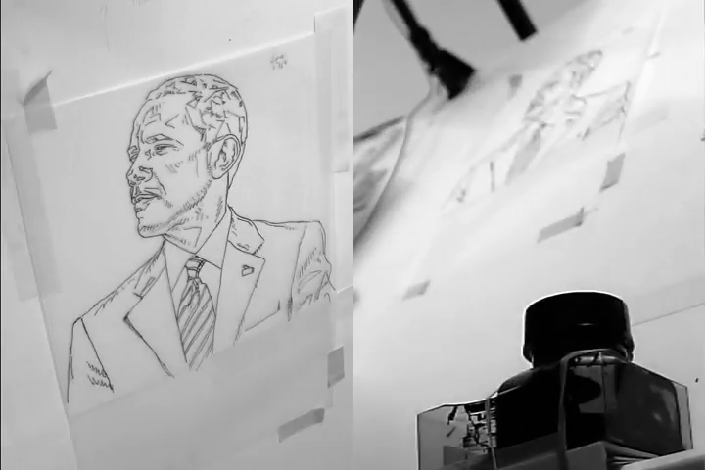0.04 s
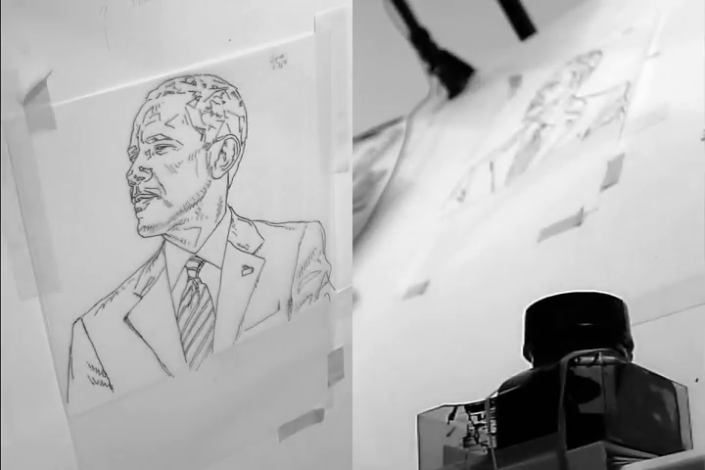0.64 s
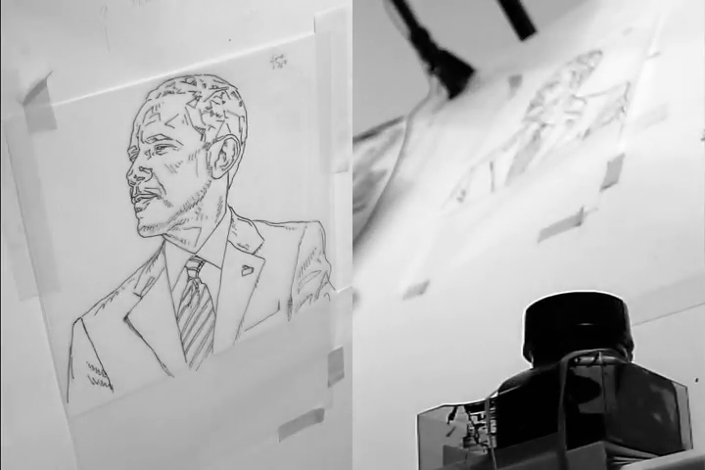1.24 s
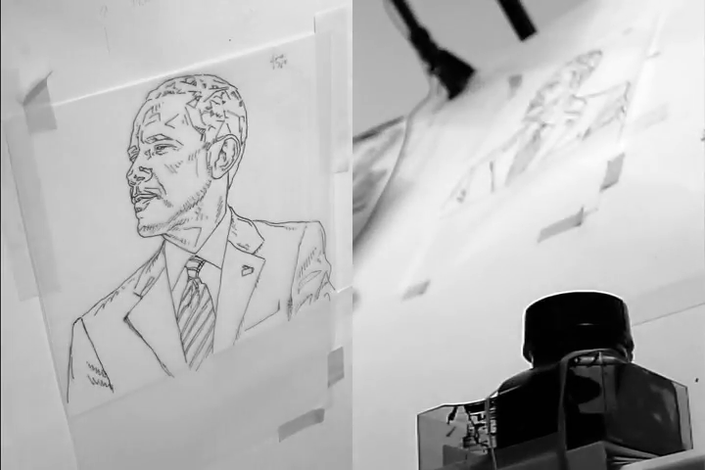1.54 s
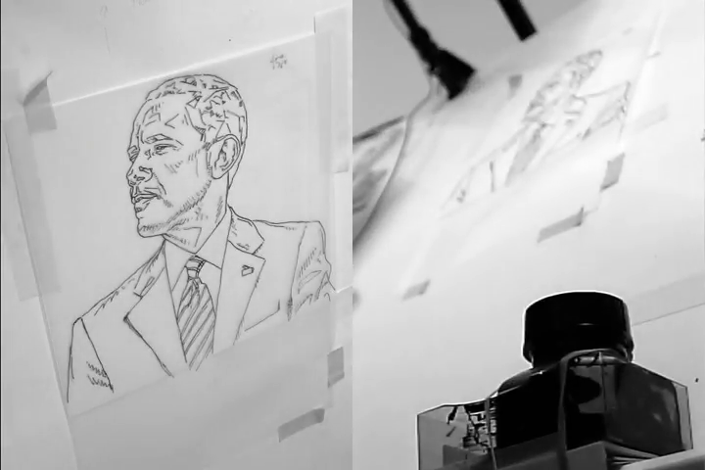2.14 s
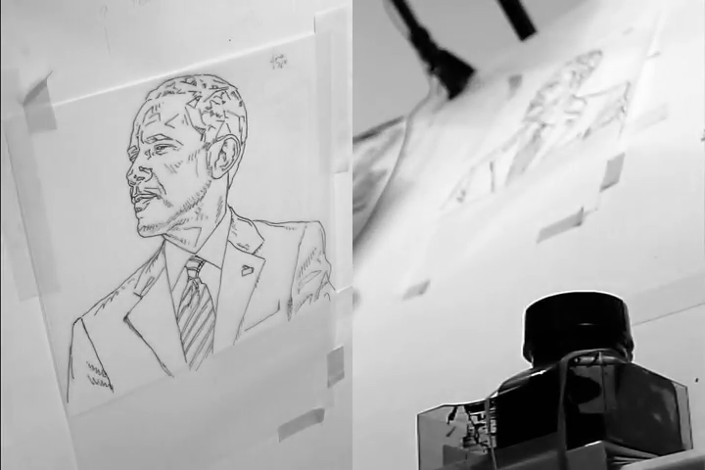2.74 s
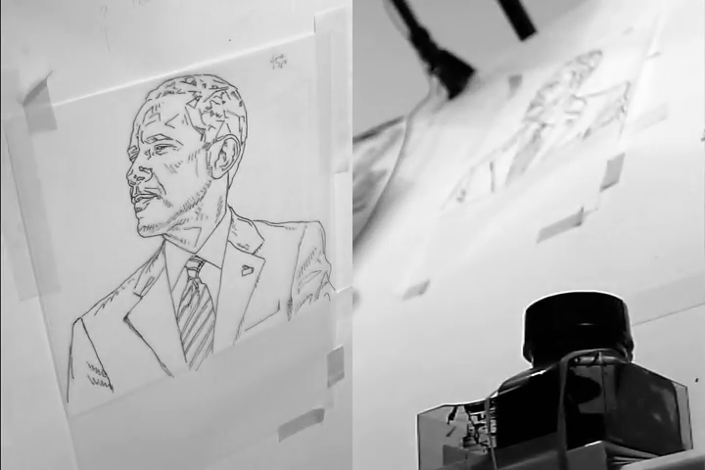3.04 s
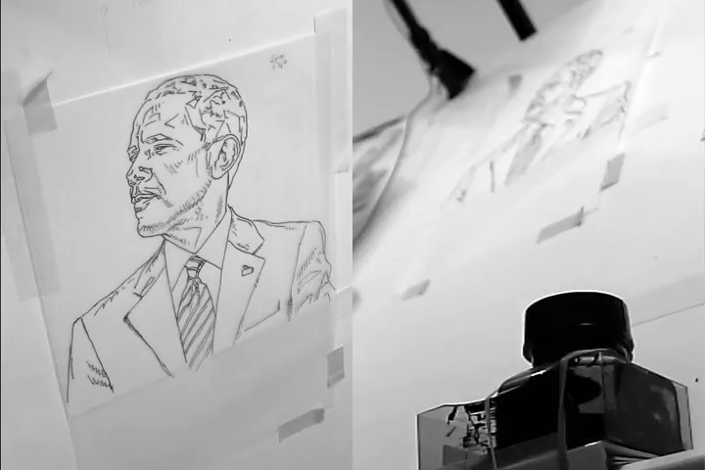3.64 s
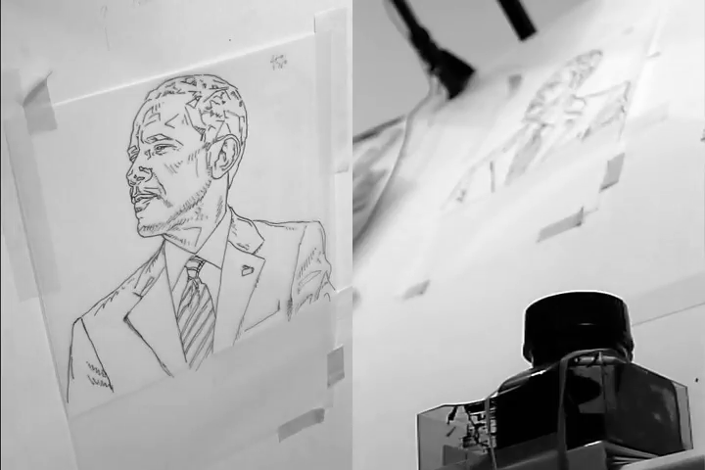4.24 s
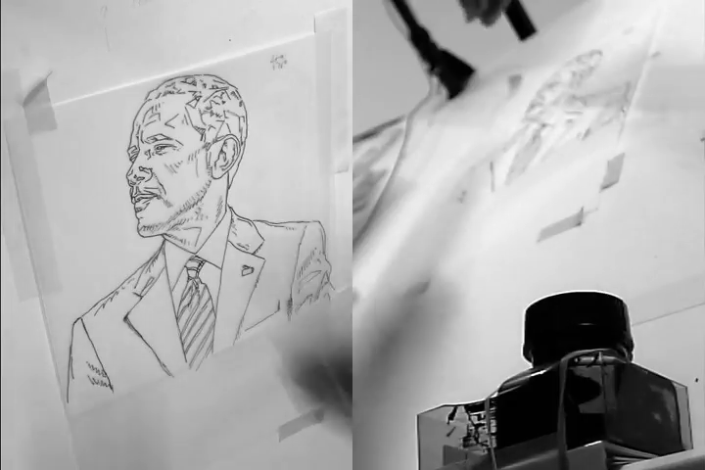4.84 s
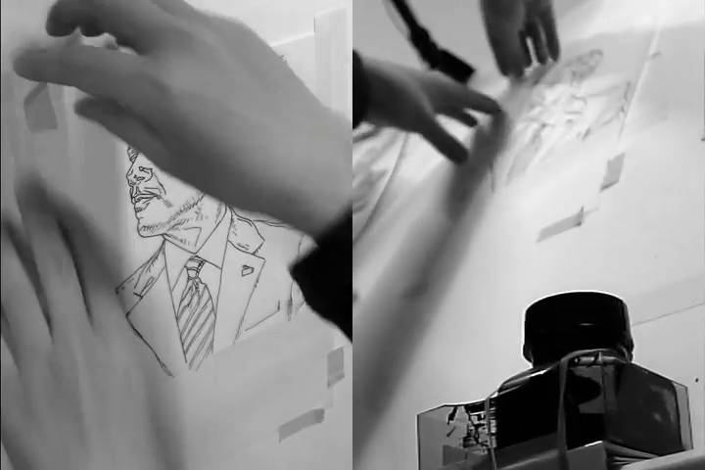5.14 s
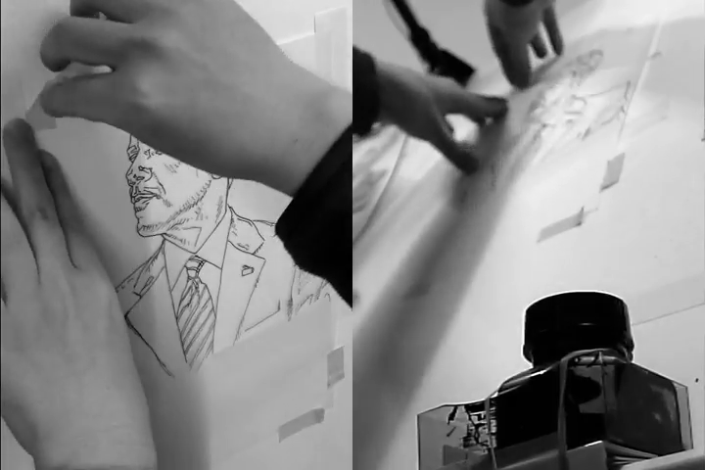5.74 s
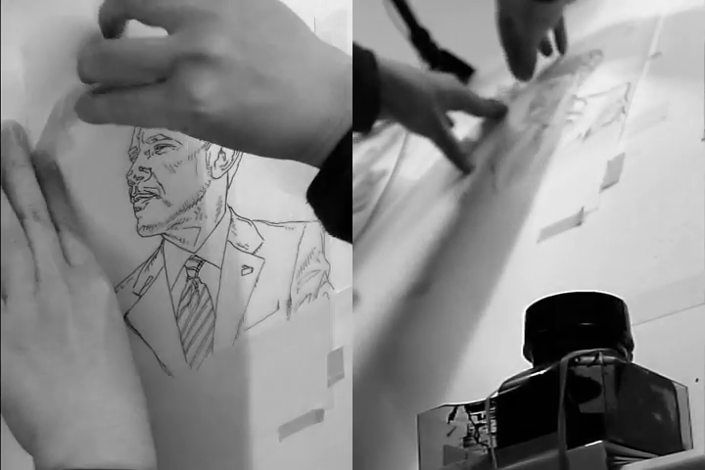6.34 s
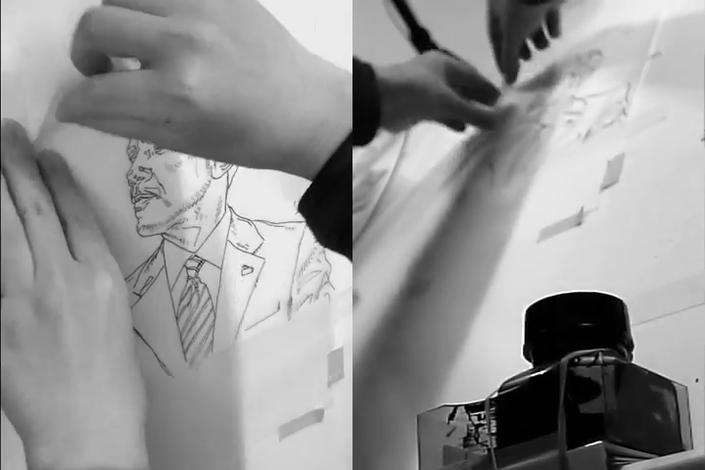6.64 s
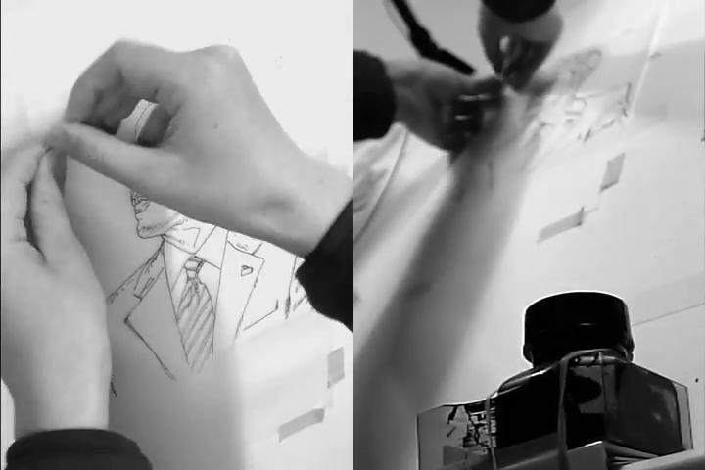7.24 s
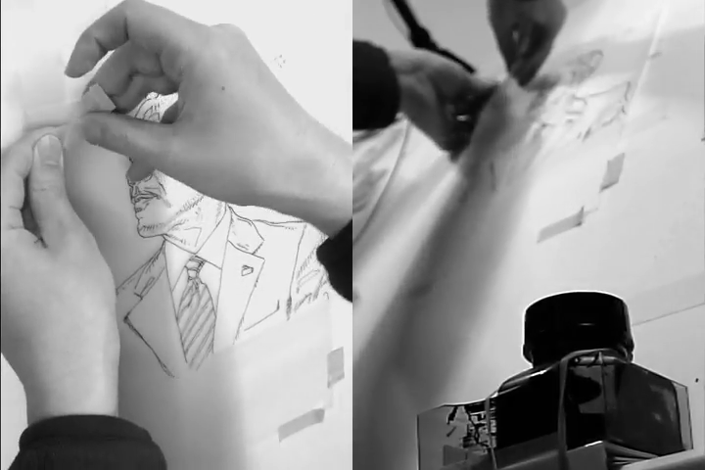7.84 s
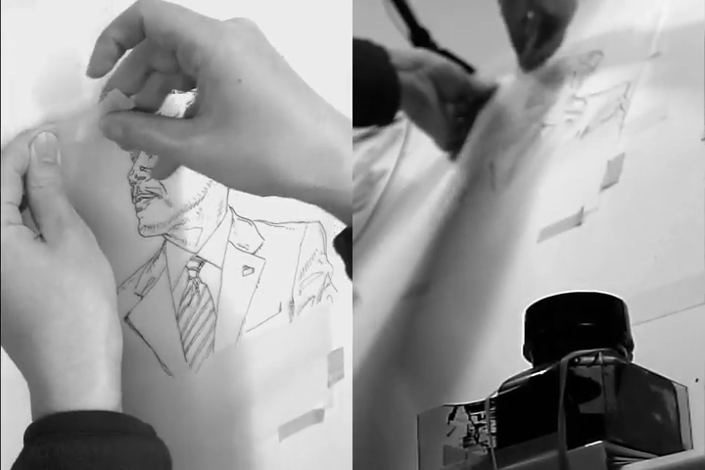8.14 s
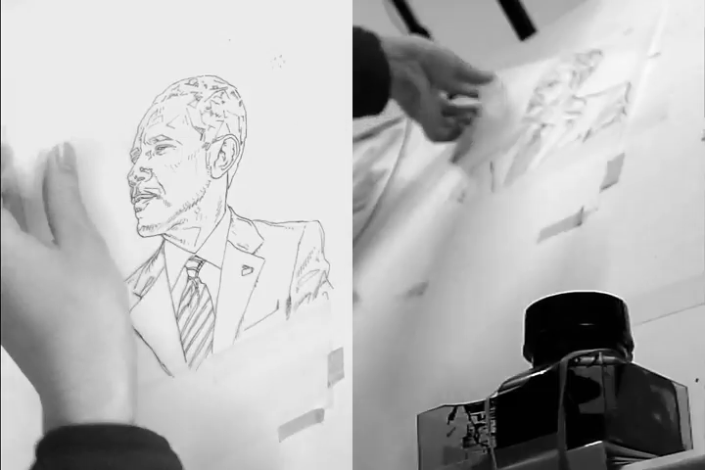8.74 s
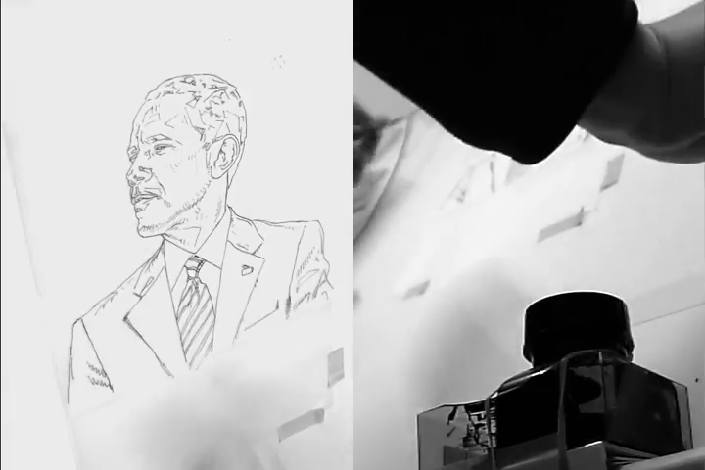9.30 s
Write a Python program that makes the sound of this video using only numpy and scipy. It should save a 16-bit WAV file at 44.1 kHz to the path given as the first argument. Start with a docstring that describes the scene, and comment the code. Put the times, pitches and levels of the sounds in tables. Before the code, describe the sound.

Something is picked up and shuffled across the room, giving light knocks and a brief scrape with a little echo. Then, up close and dry, cloth sweeps softly over a desk, hands thump down, and paper snaps crisply as it is pulled free. Fingers rub and slide over the sheet with small crackles, above a steady, faint indoor hiss and hum.

```python
"""Hollow knocks and a rough drag, a little way off: something is picked up and shuffled in a quiet room.
A sleeve brushes a drawing desk and hands land on it, ringing its low modes. Close up, a sheet of paper
buckles with sharp cracks, is jerked loose and is smoothed down, its fibres catching under the fingers.
The paper is almost dry and the far handling is roomy; under both lies a bed of hiss and faint hum."""
import sys
import numpy as np
from scipy import signal
from scipy.fft import rfft, irfft
from scipy.io import wavfile
from scipy.ndimage import uniform_filter1d

SR = 44100
rng = np.random.default_rng(int(sys.argv[2]) if len(sys.argv) > 2 else 0)


def materialize(psi):
    """Save the field psi as 16-bit PCM at rate SR to the path in sys.argv[1].

    A 1-D psi becomes a single channel; in a 2-D psi each row is a channel.
    """
    bounded = np.clip(np.atleast_2d(psi).T, -1, 1)
    quanta = np.round(bounded * 32767).astype(np.int16)
    wavfile.write(sys.argv[1], SR, quanta)


N = 413216
TIME = np.arange(N) / SR

# Cue lists; their levels are trims ahead of each layer's EQ and gain.
# the sheet buckles: (time [s], crack [dB], flap [dB], crinkle decay [s], crack [Hz], flap [Hz])
SNAP_CUES = [(2.9706, -35, -65, 0.0031, 5100, 891), (3.1083, -36, -59, 0.0036, 5930, 993),
             (5.2198, -30, -50.5, 0.0027, 5550, 1370), (5.7286, -37, -63, 0.0015, 5900, 775),
             (5.7459, -41, -55, 0.0014, 4460, 1880), (5.971, -17.5, -38, 0.0022, 5370, 1730),
             (6.2342, -14, -33, 0.002, 6200, 1530), (6.3051, -18, -50, 0.0043, 5700, 1120),
             (6.3118, -15, -53, 0.0017, 5470, 1710), (6.317, -23, -29.5, 0.0014, 6500, 1950),
             (6.3204, -6.5, -40, 0.0023, 6560, 1130), (6.3236, -22, -38.5, 0.0025, 6350, 610),
             (6.4191, -31, -41, 0.0011, 5550, 1180), (7.017, -39, -49.5, 0.002, 4540, 1750),
             (7.1593, -28, -40, 0.0029, 5040, 1680), (7.1678, -22.5, -41, 0.0015, 4540, 1930),
             (7.3258, -19.5, -35, 0.0011, 4900, 1560), (8.121, -32, -49, 0.0013, 5900, 2160),
             (8.1988, -26, -54, 0.0017, 6250, 1650), (8.2169, -24, -41, 0.0023, 6270, 2060),
             (8.3479, -41, -58, 0.0015, 5380, 1640)]
# paper jerks over paper: (time [s], length [s], hiss [dB], body [dB], sheet resonance [Hz])
SLIP_CUES = [(5.226, 0.02, -62, -55.5, 5500), (6.222, 0.022, -51, -49, 5430),
             (6.228, 0.044, -44, -51, 6800), (6.266, 0.048, -31, -52, 5970),
             (6.311, 0.016, -25.5, -36.5, 6300), (6.315, 0.026, -35, -45, 6500),
             (6.417, 0.0066, -34.5, -39, 5660), (7.108, 0.06, -40, -50, 5100),
             (7.182, 0.088, -46.5, -54, 5130), (7.263, 0.039, -41.5, -49, 3950),
             (7.302, 0.042, -50, -55, 5000), (7.39, 0.025, -55, -61, 4800), (7.752, 0.037, -51, -60, 4500),
             (8.164, 0.049, -48, -69, 6140), (8.21, 0.034, -48, -53.5, 4200)]
# finger strokes: (time [s], length [s], hiss [dB], body [dB], starting sheet resonance [Hz])
SLIDE_CUES = [(1.07, 0.13, -58, -70, 6900), (1.11, 0.073, -51, -53, 6860), (5.24, 0.14, -53.5, -59.5, 5900),
              (5.406, 0.071, -56.5, -59, 5900), (5.783, 0.11, -58, -65, 6200),
              (6.48, 0.075, -56.5, -67, 6300), (6.575, 0.16, -52.5, -61.5, 6700),
              (6.678, 0.11, -49, -62.5, 5400), (6.748, 0.1, -56.5, -63, 5700),
              (6.808, 0.125, -54, -59.5, 5300), (6.895, 0.08, -50, -56.5, 5500),
              (6.978, 0.17, -55, -59.5, 5230), (7.31, 0.125, -61, -63, 5200),
              (7.514, 0.09, -56, -55.5, 4830), (7.576, 0.083, -63, -63, 4800),
              (7.656, 0.091, -49, -54.5, 4800), (7.738, 0.16, -50.5, -54, 4900),
              (7.842, 0.21, -51, -54, 4450), (8.022, 0.18, -51, -59, 3350),
              (8.14, 0.16, -53.5, -53.5, 5800), (8.308, 0.09, -57, -75, 5600),
              (8.576, 0.17, -64, -68, 5770), (8.8, 0.09, -57.5, -61, 6000)]
# hits on the desk, soft from the hands, hard from the sheet: (time [s], level [dB], contact [s])
THUMP_CUES = [(5.222, -46, 0.0036), (5.233, -33, 0.0037), (5.542, -42, 0.004), (5.847, -49, .004),
              (6.235, -60.5, 0.00086), (6.319, -44, 0.00099), (6.42, -57.5, 0.00044), (6.488, -62, 0.00098),
              (6.842, -64, 0.001), (8.331, -40, .011)]
# a sleeve crosses the desk: (time [s], length [s], level [dB])
SLEEVE_CUES = [(4.15, 0.99, -66), (5.2, 0.42, -66), (5.68, 0.37, -69)]
# far knocks: (time [s], tick [dB], hollow body [dB], contact decay [s], tick [Hz], body [Hz])
KNOCK_CUES = [(0.3748, -51, -49, 0.0035, 6010, 891), (0.5602, -26.5, -38.5, 0.0055, 5940, 1150),
              (1.3775, -54, -49.5, 0.0071, 5030, 950), (1.8025, -41, -52, 0.014, 4820, 1260),
              (1.8411, -32, -41, 0.0066, 5840, 1960), (1.887, -54, -40, 0.0043, 4120, 1210),
              (1.9235, -41, -54, 0.0021, 5100, 1390), (1.9626, -36.5, -35.5, 0.0058, 5700, 1450),
              (2.0612, -54, -52, 0.003, 4030, 1210), (2.143, -58, -53.5, 0.003, 5120, 762),
              (2.4925, -58, -51, 0.0081, 4820, 795)]
# far shoves that drag something along: (time [s], length [s], level [dB])
SHOVE_CUES = [(0.698, 0.09, -64.5), (1.265, 0.046, -67), (1.65, 0.097, -56), (1.79, 0.066, -43),
              (1.836, 0.044, -36), (1.873, 0.049, -37), (1.955, 0.055, -48.5), (2.135, 0.036, -59),
              (2.495, 0.033, -64)]

# EQ curves: (frequency [Hz], relative level [dB])
CRACK_EQ = [(500, -51), (2200, -19.5), (3500, -4), (4800, 0), (5700, 0), (6700, -1.5), (7500, -10),
            (8500, -28.5), (11000, -45.5), (16000, -64)]  # bright edge of a snap or knock
FLAP_EQ = [(60, -22), (250, -7.5), (420, -9), (620, -5), (800, -5.5), (1150, -2), (1700, -2.5), (2600, 0.5),
           (4000, -4), (7000, -25.5), (10000, -72)]  # midrange of the flapping sheet
HISS_EQ = [(500, -44), (2000, -26), (3200, -9), (4400, 2.5), (5500, 1.5), (6700, 1), (7500, -8),
           (8600, -27), (11000, -36.5), (16000, -61)]  # top end of paper friction
FIBRE_EQ = [(500, -27), (1500, -5.5), (2600, 4), (4500, 1.5), (6600, -1), (7500, -8), (8600, -26.5),
            (11000, -51.5), (16000, -50.5)]  # fibres ringing the sheet
RUB_EQ = [(80, -13), (300, -13), (650, -12), (1100, -1.5), (1450, -6.5), (1800, 3), (2150, -1), (2700, 5),
          (3800, -9.5), (6000, -52), (10000, -59)]  # body of skin pressing on paper
SLEEVE_EQ = [(30, -7), (90, -19), (140, -12), (210, 3), (300, -11), (450, -6.5), (900, -33), (3000, -40),
             (9000, -77)]  # dull brush of cloth
HOLLOW_EQ = [(80, -38), (300, -5), (450, -8), (700, -1.5), (1200, -0.5), (1650, -1.5), (2000, -0.5),
             (2900, -6), (4500, -16.5), (6500, -16), (8600, -70), (12000, -77)]  # body of the knocked object
SCRAPE_EQ = [(80, -26), (220, -27.5), (320, -10.5), (450, -7.5), (680, -4.5), (900, -7), (1200, 3.5),
             (1600, -2), (2000, -1.5), (2900, -6.5), (4500, -15), (6500, -17), (8300, -55), (12000, -69)]  # rasp of the drag
AIR_EQ = [(20, -21), (32, -11), (70, -6.5), (120, -6), (200, -3.5), (300, -4), (420, -5), (540, -5),
          (1700, -7), (3200, -10.5), (6600, -12), (7700, -23), (8400, -35.5), (9000, -48.5), (15500, -45)]  # room hiss

# ring of the desk: (frequency [Hz], relative level [dB], t60 [s])
DESK_MODES = [(61, -25, 0.36), (89.6, -13, 0.15), (189, -2, 0.11), (221.2, -4.5, 0.17), (282, -6.5, 0.12),
              (503, -1, 0.096), (636, 11, 0.044), (1075, 11.5, 0.045), (1153, 7.5, .05)]
# narrow noise bands of the hum: (frequency [Hz], width per filter pass [Hz], level [dB])
HUM_BANDS = [(100.3, 12, -77.5), (1235, 26, -80.5), (1740, 66, -77.5), (2389, 50, -77.5), (2718, 55, -78.5)]
# reverb time of the room: (frequency [Hz], t60 [s])
ROOM_DECAY = [(250, 0.22), (700, 0.45), (1700, 0.27), (4600, 0.15), (8000, 0.17)]

GRIP_DB, GRIP_HZ = 1.4, 55  # skin grips unevenly: rms depth and bandwidth of the flutter
SHEET_SAG_OCT_PER_S = 1.1  # the sheet's resonance sinks as the fingers travel
AIR_DB, HIGH_CUT_HZ = -60.5, 15700


def sheet_snaps():
    """The sheet buckles with a sharp crack while its surface flaps."""
    crack, flap = impacts(SNAP_CUES, click=5.0, treble_width_hz=410, body_width_hz=320, ring=1.63)
    return colour(amp(5.0) * crack, CRACK_EQ) + colour(amp(17.5) * flap, FLAP_EQ)


def sheet_slips():
    """Short jerks of paper over paper: dense tiny catches ring the free part of the sheet."""
    hiss, body = np.zeros(N), np.zeros(N)
    grain = friction(per_s=4000, spread_db=1.0, smooth=0.26)
    for start, length, hiss_db, body_db, hz in SLIP_CUES:
        stroke = evened(grain[round(start * SR):][:round(length * SR)])
        stroke *= signal.windows.tukey(len(stroke), 0.6)
        stroke = np.pad(stroke, (0, 512))  # space to ring out
        add(hiss, start, amp(hiss_db) * (0.16 * stroke + 0.87 * resonate(stroke, hz, width=1300)))
        add(body, start, amp(body_db) * stroke)
    return colour(hiss, HISS_EQ) + colour(body, FLAP_EQ)


def finger_slides():
    """Skin smooths the sheet: fine friction gives a hiss, a sinking resonance and a lower rub."""
    grip_lowpass = np.exp(-(np.fft.rfftfreq(N, 1 / SR) / GRIP_HZ) ** 2)
    grip = evened(irfft(rfft(rng.standard_normal(N)) * grip_lowpass, N))
    grain = friction(per_s=1500, spread_db=4, smooth=0.99) * amp(GRIP_DB * grip)
    hiss, body, sheet_hz = np.zeros(N), np.zeros(N), np.zeros(N)
    for start, length, hiss_db, body_db, hz in SLIDE_CUES:
        # the fingers speed up, slow gradually and lift
        stroke = grain * motion(start, length, attack_s=0.035, release_s=0.061, fade_db_per_s=-21)
        hiss += amp(hiss_db) * stroke
        body += amp(body_db) * stroke
        sag_oct = SHEET_SAG_OCT_PER_S * np.clip(TIME - start, 0, length)
        sheet_hz = np.where(TIME >= start, hz * 2 ** -sag_oct, sheet_hz)
    singing = colour(resonate(hiss, sheet_hz, width=2120), FIBRE_EQ)
    return amp(-12.5) * colour(hiss, HISS_EQ) + amp(2.5) * singing + amp(1.0) * colour(body, RUB_EQ)


def desk_thumps():
    """Hits ring the desk; a soft, long contact reaches only its low modes."""
    t, thumps = np.arange(SR // 2) / SR, np.zeros(N)
    for start, db, contact in THUMP_CUES:
        ring = sum(amp(mode_db - 60 * t / t60) * np.sin(2 * np.pi * hz * t) / (1 + (hz * contact) ** 3)
                   for hz, mode_db, t60 in DESK_MODES)
        attack = 1 - np.exp(-t / (0.53 * contact))
        add(thumps, start, amp(db) * ring * attack)
    return thumps


def sleeve_sweeps():
    """Cloth brushes the desk in dull swells as an arm starts and stops gently."""
    swells = sum(amp(db) * motion(start, length, attack_s=0.23, release_s=0.25, fade_db_per_s=-5)
                 for start, length, db in SLEEVE_CUES)
    return colour(swells * rng.standard_normal(N), SLEEVE_EQ)


def far_knocks():
    """Things are bumped: each contact is a bright tick over a hollow body."""
    tick, body = impacts(KNOCK_CUES, click=2.1, treble_width_hz=810, body_width_hz=350, ring=1.0)
    return colour(amp(14.0) * tick, CRACK_EQ) + colour(amp(19.0) * body, HOLLOW_EQ)


def far_drag():
    """Something scrapes along in shoves, each breaking free quickly and running out."""
    pressure = sum(amp(db) * motion(start, length, attack_s=0.018, release_s=0.02, fade_db_per_s=-36)
                   for start, length, db in SHOVE_CUES)
    catches = pressure * friction(per_s=700, spread_db=1.0, smooth=0.92)
    # only the hardest pushes make the supporting surface groan
    hard_catches = catches * pressure / pressure.max()
    groan = resonate(resonate(hard_catches, 360, width=150), 350, width=150)
    return amp(0.5) * colour(catches, SCRAPE_EQ) + amp(3.5) * groan


def room_reverb(x, onset_s, size=32768):
    """Dense reflections that build up quickly, each band dying at its own speed."""
    spectrum = rfft(rng.standard_normal(size))
    hz, t, bands = signal.stft(irfft(spectrum / abs(spectrum)), SR, nperseg=256)
    tail = signal.istft(bands * amp(-60 * t / curve_at(ROOM_DECAY, hz)[:, None]), SR)[1]
    build_up = 1 - np.exp(-(np.arange(len(tail)) / SR / onset_s) ** 2)
    spectrum = rfft(tail * build_up)
    # a furnished room favours no single pitch
    power = abs(spectrum) ** 2
    flatten = np.sqrt(uniform_filter1d(power, size=600) / uniform_filter1d(power, size=40))
    tail = (irfft(spectrum * flatten) * build_up)[:size * 3 // 4]
    return signal.oaconvolve(x, tail / np.linalg.norm(tail))[:N]


def room_tone():
    """A steady bed of hiss with a faint wavering hum."""
    air_gain = amp(curve_at(AIR_EQ, np.fft.rfftfreq(N, 1 / SR)))
    air = irfft(rfft(rng.standard_normal(N)) * air_gain, N)
    noise = rng.standard_normal(N)
    hum = sum(amp(db) * evened(resonate(resonate(noise, hz, width), hz, width))
              for hz, width, db in HUM_BANDS)
    return amp(AIR_DB) * evened(air) + hum


def impacts(cues, click, treble_width_hz, body_width_hz, ring, size=2048):
    """Each hit is a click and a spray of smaller ones ringing the spot struck; returns treble, body."""
    treble, body = np.zeros(N), np.zeros(N)
    for start, treble_db, body_db, decay_s, treble_hz, body_hz in cues:
        push = crinkle(rng.standard_normal(size) + click * signal.unit_impulse(size), decay_s)
        add(treble, start, amp(treble_db) * (push + ring * resonate(push, treble_hz, treble_width_hz)))
        add(body, start, amp(body_db) * (push + ring * resonate(push, body_hz, body_width_hz)))
    return treble, body


def crinkle(noise, decay_s):
    """A dying spray of tiny clicks, even in colour and of energy 1."""
    fade = np.exp(-np.arange(len(noise)) / SR / max(decay_s, 1e-4))
    spectrum = rfft(noise * fade)
    spray = irfft(spectrum / (abs(spectrum) + 1e-12)) * fade ** (1 / 4)
    return spray / np.linalg.norm(spray)


def friction(per_s, spread_db, smooth):
    """Fibres catch and let go: clicks of uneven size over a smooth rush."""
    strength = amp(spread_db * np.minimum(rng.exponential(1, N), 4))
    clicks = strength * rng.choice([-1, 1], N) * (rng.random(N) < per_s / SR)
    return evened(evened(clicks) + smooth * rng.standard_normal(N))


def motion(start, length, attack_s, release_s, fade_db_per_s):
    """Envelope of one gesture: it swells, holds while fading a little, and stops."""
    age = np.clip(TIME - start, 0, length)
    ramps = np.minimum(age / attack_s, 1) * np.minimum((length - age) / release_s, 1)
    return ramps * amp(fade_db_per_s * age)


def resonate(x, hz, width):
    """A resonance of gain 1, `width` Hz wide, that can follow a moving frequency."""
    carrier = np.exp(2j * np.pi * np.cumsum(hz * np.ones(len(x))) / SR)
    pole = np.exp(-np.pi * width / SR)
    return 2 * (carrier * signal.lfilter([1 - pole], [1, -pole], x / carrier + 1e-18)).real


def colour(x, eq, size=4096):
    """Applies an EQ curve as a minimum-phase filter of energy 1."""
    log_gain = np.log(amp(curve_at(eq, abs(np.fft.fftfreq(size, 1 / SR)))))
    response = np.exp(np.conj(signal.hilbert(log_gain)))
    taps = np.fft.ifft(response).real[:size // 2]
    return signal.oaconvolve(x, taps / np.linalg.norm(taps))[:N]


def curve_at(points, hz):
    """Reads a curve on a log-frequency axis."""
    point_hz, value = np.transpose(points)
    return np.interp(np.log(hz + 1), np.log(point_hz + 1), value)


def amp(db):
    """Decibels to gain."""
    return 10 ** (np.asarray(db) / 20)


def evened(x):
    """Scales to rms 1."""
    return x / np.sqrt(np.mean(x ** 2) + 1e-20)


def add(mix, start_s, sound):
    """Drops a sound into the mix at its cue."""
    part = mix[round(start_s * SR):][:len(sound)]
    part += sound[:len(part)]


def scene():
    """Mono mix: paper and desk almost dry, the far handling wet, room tone underneath."""
    near = sheet_snaps() + sheet_slips() + finger_slides() + desk_thumps() + sleeve_sweeps()
    near_reverb = amp(-12) * room_reverb(near, onset_s=0.0011)
    knocks, drag = far_knocks(), far_drag()
    far_reverb = room_reverb(amp(-2.5) * knocks + amp(-5) * drag, onset_s=0.0037)
    return (near + near_reverb + knocks + drag + far_reverb + room_tone())[None]


def record(dry):
    """The recorder's band limit: a steep high cut."""
    high_cut = signal.firwin(511, HIGH_CUT_HZ, window=("kaiser", 9), fs=SR)
    return signal.oaconvolve(dry, high_cut[None], "same")


dry = scene()
out = record(dry)
materialize(out)
```